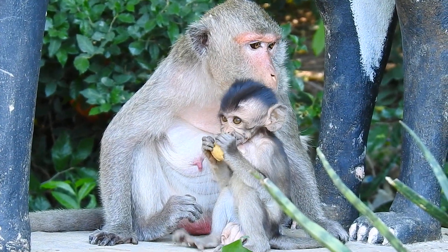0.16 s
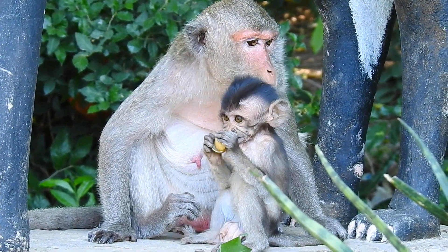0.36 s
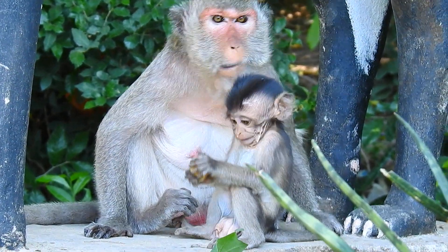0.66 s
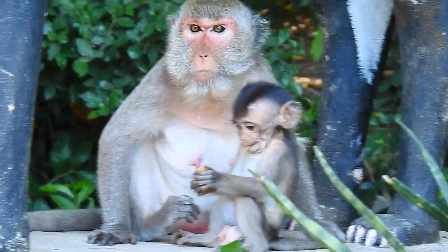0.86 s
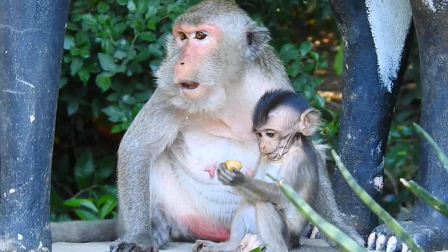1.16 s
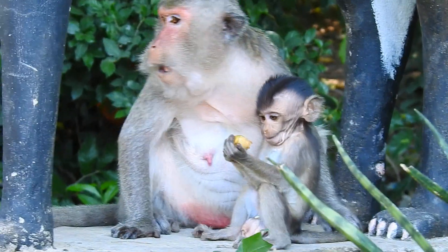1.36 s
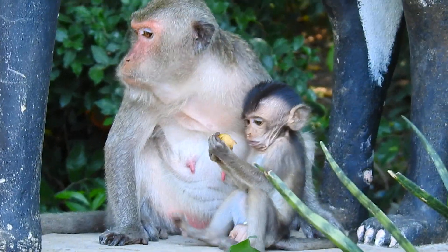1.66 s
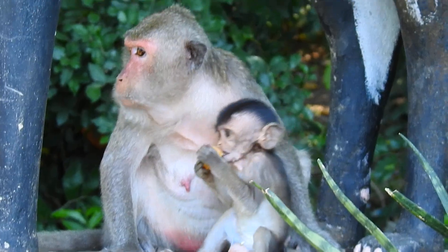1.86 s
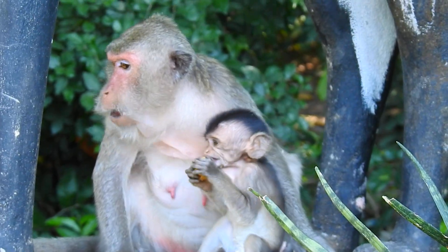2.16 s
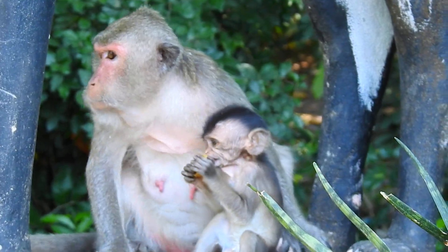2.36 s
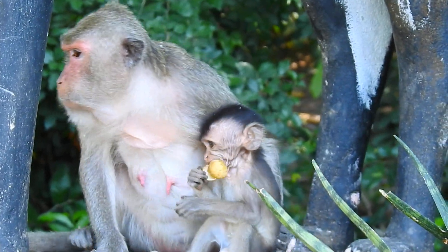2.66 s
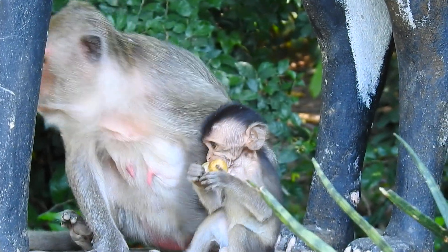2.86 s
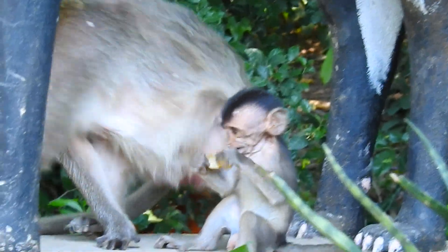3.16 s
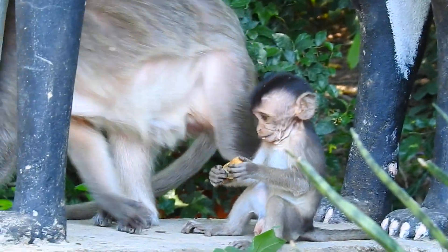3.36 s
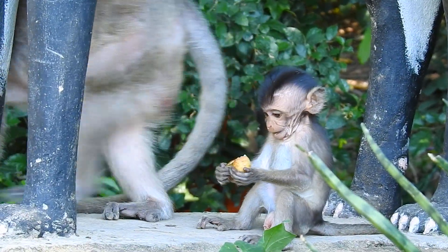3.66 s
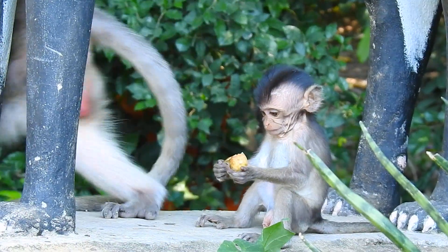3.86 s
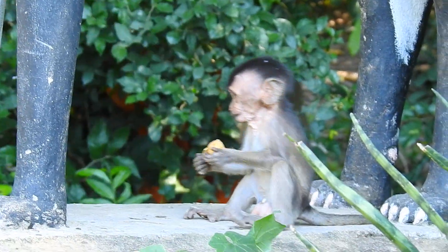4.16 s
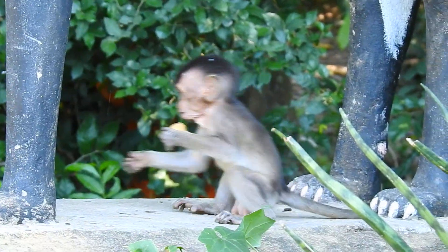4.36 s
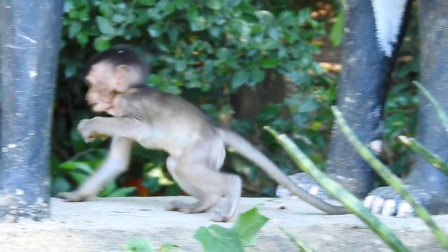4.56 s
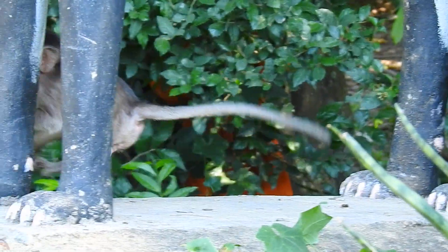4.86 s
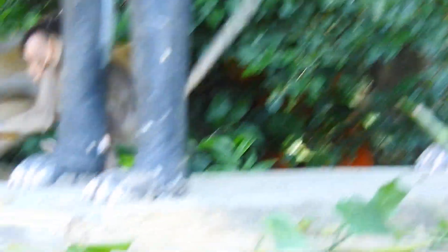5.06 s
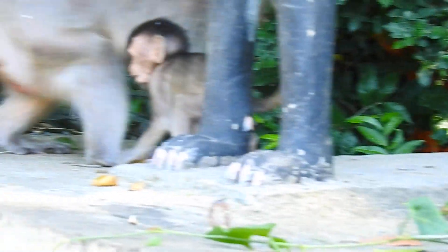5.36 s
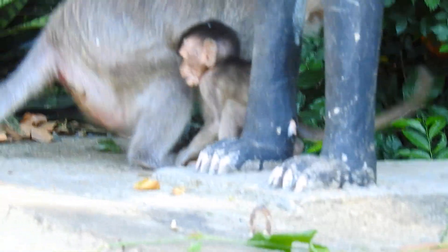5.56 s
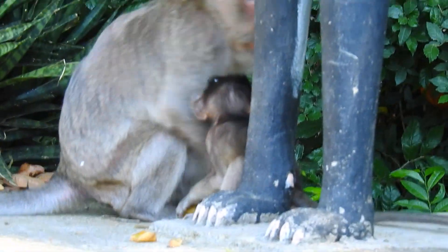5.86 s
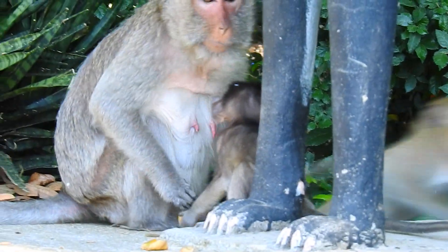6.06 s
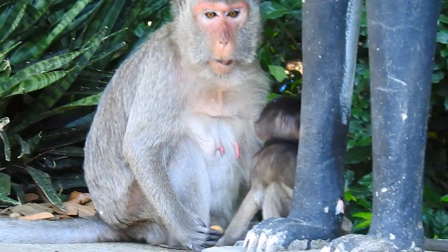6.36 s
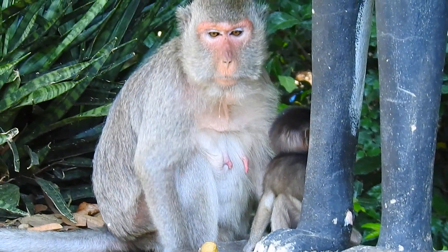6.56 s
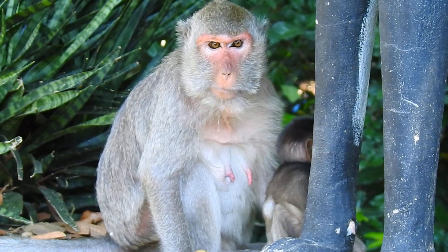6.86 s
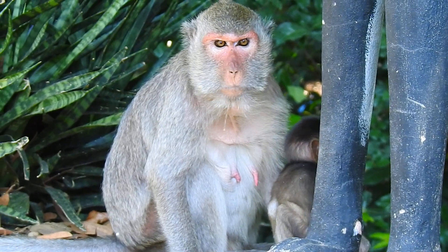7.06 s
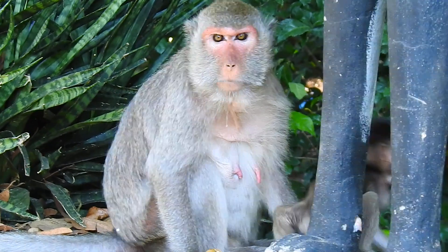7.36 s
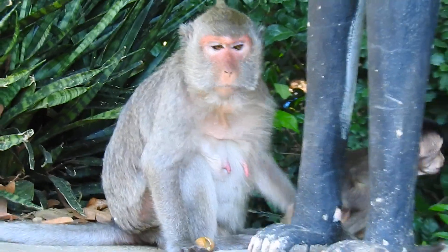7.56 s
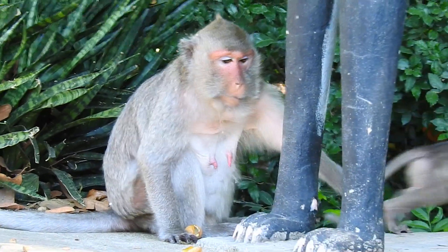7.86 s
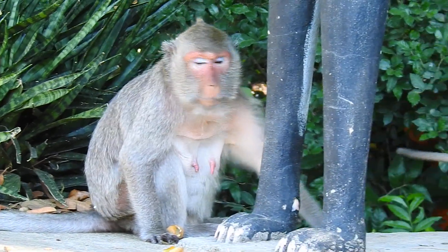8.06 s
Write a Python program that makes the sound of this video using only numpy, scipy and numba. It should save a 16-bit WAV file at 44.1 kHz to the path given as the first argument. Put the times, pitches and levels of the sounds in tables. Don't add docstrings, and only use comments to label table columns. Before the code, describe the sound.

Outdoors among stone statues, a small engine thumps at idle with traffic hum and leaf hiss, slowly receding. A far brake whines early on. Light foot and fruit knocks follow, then a young monkey whoops into a long, very thin scream that cracks into a loud shriek. Sound cuts out for a quarter second, then come whimpers, bright chirping cries and a closing wail. Stereo microphones a few metres away, short stony echoes.

```python
import sys
import numpy as np
from scipy import signal
from scipy.io import wavfile
from scipy.ndimage import uniform_filter1d, map_coordinates
from numba import njit

SR = 44100
rng = np.random.default_rng(int(sys.argv[2]) if len(sys.argv) > 2 else 0)


def generate_wav(sig):
    pcm = np.round(np.clip(np.atleast_2d(sig).T, -1, 1) * 32767).astype(np.int16)
    wavfile.write(sys.argv[1], SR, pcm)


def boost_factor(decibels):
    exponent = np.asarray(decibels, float) / 20
    return 10 ** exponent


N = 362061
TIME = np.arange(N) / SR


@njit
def svf(x, hz, width):
    y, b, l = np.empty(len(x)), 0., 0.
    for i in range(len(x)):
        g, k = np.tan(np.pi * hz[i] / SR), width / hz[i]
        v = (b + g * (x[i] - l)) / (1 + g * (g + k))
        b, l, y[i] = 2 * v - b, l + 2 * g * v, k * v
    return y


def band(x, hz, width):
    return svf(x, hz * np.ones(len(x)), float(width))


def band_twice(x, hz, width):
    return band(band(x, hz, width), hz, width)


def dull(x, hz):
    return signal.sosfilt(signal.butter(6, hz, fs=SR, output="sos"), x)


def unit(x):
    return x / np.sqrt(np.mean(x ** 2))


def walk(rate, size):
    k = max(int(SR / rate), 1)
    held = np.repeat(rng.standard_normal(size // k + 1), k)
    return 1.4 * uniform_filter1d(uniform_filter1d(held, k), k)[:size]


def read(table):
    s, *columns = np.transpose(table)
    span = slice(int(s[0] * SR), min(int(s[-1] * SR), N))
    t = TIME[span]
    fade = np.clip(np.minimum(t - t[0], t[-1] - t) / 0.0013, 0, 1)
    return span, [np.interp(t, s, c) for c in columns], fade


def note(start, length, first_hz, last_hz, db, peak=.2, start_db=-5, end_db=-5):
    top_hz = first_hz + peak * (last_hz - first_hz)
    return read([(start, first_hz, db + start_db),
                 (start + peak * length, top_hz, db),
                 (start + length, last_hz, db + end_db)])


def blend(ends, share):
    return ends[0] + share * (ends[1] - ends[0])


def turns(hz, jitter):
    return 2 * np.pi * np.cumsum(hz * (1 + jitter * walk(1500, len(hz)))) / SR


def stack(hz, levels, jitter):
    p = turns(hz, jitter)
    return np.sqrt(2) * sum(boost_factor(db) * np.sin((k + 1) * p) for k, db in enumerate(levels))


def pan(x, db):
    return x * boost_factor(np.array([[db], [-db]]) / 2)


def breeze():
    ports = [unit(band_twice(rng.standard_normal(N), 60, 70)) for _ in range(2)]
    return np.array([boost_factor(-60 + 3.0 * walk(3, N)) * port for port in ports])


# (time [s], level [dB])
TRAFFIC = [(0, -37), (.9, -37.5), (1.44, -37.5), (3.14, -40), (3.9, -41), (5.9, -42.5), (7.44, -44),
           (8.21, -44.5)]
# (time [s], level [dB])
GUSTS = [(0, -36.5), (.3, -36.5), (.6, -37), (.78, -36), (1.05, -39.5), (1.4, -43.5), (1.6, -40),
         (2.3, -40.5), (3.0, -42), (3.8, -42.5), (5.4, -41.5), (6.2, -45.5), (7.2, -45), (7.5, -46.5),
         (8.21, -46.5)]
# (frequency [Hz], density [dB per Hz])
TRAFFIC_COLOUR = [(30, -32.5), (61, -8.5), (85, -4), (164, 1), (500, -17.5), (760, -12), (1820, -17.5),
                  (2300, -15.5)]
# (frequency [Hz], density [dB per Hz])
LEAVES_COLOUR = [(3200, -23.5), (3680, -20), (4200, -21.5), (6550, -17), (9950, -100), (15500, -75)]


def outdoors():
    traffic_db = np.interp(TIME, *np.transpose(TRAFFIC)) + 3.0
    leaves_db = np.interp(TIME, *np.transpose(GUSTS)) + 2.0 + 0.5 * walk(4, N)
    f, colour_db = np.transpose(TRAFFIC_COLOUR + LEAVES_COLOUR)
    traffic, leaves = 0, 0
    for hz in 40 * 2 ** (np.arange(27) / 3):
        mid, side = (band_twice(rng.standard_normal(N), hz, hz / 3) for _ in range(2))
        wide = np.clip(0.41 * (hz / 2000) ** 0.57, 0, 1)
        db = np.interp(np.log(hz), np.log(f), colour_db) + 1.36 * walk(9.7, N)
        layer = boost_factor(db) * (mid + wide * side * np.array([[1], [-1]]))
        if hz < 3000:
            traffic = traffic + layer
        else:
            leaves = leaves + layer
    return pan(boost_factor(traffic_db) * unit(traffic), 1.7) + boost_factor(leaves_db) * unit(leaves)


# (time [s], pitch [Hz], level [dB], grip [0-1])
BRAKE = [(1.218, 1512, -55, 0), (1.232, 1567, -43, 0.07), (1.294, 1593, -38.5, 0.15),
         (1.356, 1612, -35, 0.43), (1.37, 1512, -36, .2), (1.395, 1510, -44, .4), (1.43, 1587, -35.5, 0),
         (1.478, 1609, -40.5, 0), (1.544, 1628, -40.5, 0.98), (1.866, 1600, -31, 0.63),
         (2.268, 1640, -38, 0.98), (2.4, 1618, -43, 0.38)]
# (level at loose grip [dB], level at full grip [dB])
BRAKE_ORDERS_DB = [(3, -9.5), (-14, 3), (-27, -33), (-46, 0.5)]
# (start [s], length [s], first pitch [Hz], last pitch [Hz], level [dB])
WHISTLES = [
    (1.941, .21, 11080, 10700, -77),
    (5.979, 0.065, 2610, 3351, -53),
    (6.052, .04, 3340, 3340, -54),
]


def whines():
    out = np.zeros((2, N))
    span, (hz, db, grip), fade = read(BRAKE)
    levels = [db + blend(ends, grip) for ends in BRAKE_ORDERS_DB]
    out[:, span] += pan(fade * stack(hz, levels, 0.004), 0.88)
    for row in WHISTLES:
        span, (hz, db), fade = note(*row, peak=.4, start_db=2, end_db=7)
        out[:, span] += fade * stack(hz * (1 + 0.01 * walk(25, len(hz))), [db], .006)
    return out


# (time [s], level [dB], lean to the deep resonance [dB])
ENGINE = [(0, -29.5, 0), (.27, -29, -0.5), (.98, -29, -2), (1.76, -34, -2.5), (2.24, -32.5, 3.5),
          (2.77, -34.5, 3), (3.53, -33.5, 3.5), (5.05, -39.5, -1), (5.75, -38, 3.5), (6.08, -41.5, -1),
          (6.46, -46, 9), (6.61, -39.5, 3.5), (8.21, -47, 0)]
# (time [s], firings [per s])
IDLE_HZ = [(0, 16.996), (1, 16.79), (1.7, 16.267), (4.8, 16.31), (5.6, 16.145), (8.21, 16.07)]
# (frequency [Hz], width [Hz], lead [s])
PIPE = [(87.7, 47, 0.0031), (116, 78.4, 0.00408), (224.4, 54, 0.01269), (360, 102, 0.01295)]
PIPE_DB, PIPE_LEAN = (-6, 0, -9, -19), (1, -1.06, 0.016, -0.13)


def engine():
    level_db, lean_db = (np.interp(TIME, np.transpose(ENGINE)[0], c) for c in np.transpose(ENGINE)[1:])
    count = .178 + np.cumsum(np.interp(TIME, *np.transpose(IDLE_HZ))) / SR
    whole = np.arange(1, count[-1])
    chance = rng.standard_normal((len(whole), 2))
    firing_s = np.interp(whole, count, TIME) + .0004 * chance[:, 0]
    pulses = np.zeros(N)
    pulses[(firing_s * SR).astype(int)] = boost_factor(0.68 * chance[:, 1])
    pulses += boost_factor(-16.5) * np.roll(pulses, int(0.02184 * SR))
    out = 0
    for db, lean, (hz, width, lead) in zip(PIPE_DB, PIPE_LEAN, PIPE):
        ring = band_twice(np.roll(pulses, -int(lead * SR)), hz, width)
        out = out - boost_factor(level_db + db + lean * lean_db) * unit(ring)
    return out


# (delay [s], level [dB])
ECHOES = [
    (.013, -9.5),
    (0.035, -9),
    (.048, -12),
    (0.076, -14),
]
# (frequency [Hz], decay time t60 [s], level [dB], stereo width [0-1])
TAIL = [(300, 0.6, -2, 0.09), (2946, 0.37, 2, 0.3), (6300, 0.47, 2, 0.58), (9500, .28, 3, .9),
        (14000, 0.15, 5.5, 1)]


def stones(x):
    t = TIME[:SR // 2]
    f, *columns = np.transpose(TAIL)
    shape = boost_factor(-1.5) * (1 - np.exp(-(t / .011) ** 2))
    for lag, db in ECHOES:
        shape = shape + boost_factor(db + 11) * np.exp(-((t - lag) / .006) ** 2)
    noise, answer = rng.standard_normal((2, len(t))), 0
    for hz in 250 * 2. ** np.arange(0, 6.5, .5):
        t60, db, wide = (np.interp(np.log(hz), np.log(f), c) for c in columns)
        mid, side = (band_twice(n, hz, hz / 2) for n in noise)
        answer = answer + boost_factor(db - 60 * t / t60) * (mid + wide * side * np.array([[1], [-1]]))
    where = np.arange(N) + .00003 * SR * walk(250, N)
    x = np.array([map_coordinates(ear, [where], mode="mirror") for ear in x])
    return signal.fftconvolve(x, boost_factor(-32) * shape * answer, axes=1)[:, :N]


# (time [s], peak [dB], centre [Hz], sharpness Q [1], ring t60 [s])
KNOCKS = [(0.737, -28, 1600, 0.72, 0.057), (1.054, -35, 530, 1.2, 0.045), (2.341, -34, 1620, 0.82, .03),
          (2.725, -39, 859, 1, .034), (3.344, -34, 725, 1, 0.034), (3.438, -34, 1460, 15, 0.064),
          (3.545, -35.5, 1200, 9, 0.059), (3.858, -24.5, 1010, 1, 0.02), (3.866, -36, 990, 1.5, 0.026),
          (4.334, -31, 1000, 1, .015), (4.352, -28, 950, 1.8, 0.041), (6.66, -31.5, 3350, 6, .03),
          (7.15, -46, 1170, 0.87, 0.037), (7.214, -36, 3900, 1.6, 0.028), (7.472, -34.5, 1000, 0.97, 0.041),
          (7.925, -32, 980, 3.8, 0.034), (7.928, -37.5, 5800, 3.4, 0.022), (7.969, -37, 1010, 2.2, 0.066),
          (4.195, -35.5, 603, 0.59, 0.12), (4.215, -35, 600, 0.73, 0.088), (.005, -36, 690, 2.8, 0.13),
          (.745, -37, 6000, 5.4, .06), (.432, -39, 6000, 3.4, .03), (.432, -39, 3100, 5, .04),
          (5.142, -28.5, 6000, 0.77, .01), (6.66, -34.5, 8130, 0.65, 0.25), (7.699, -37.5, 8160, .8, 0.26),
          (5.63, -47.5, 8300, .7, .3), (7.472, -42.5, 6000, 1, .02), (7.216, -47.5, 8150, 2, .015),
          (3.859, -30, 788, 1, .02)]
# (start [s], length [s], peak [share of length], thud [dB], scrape [dB])
SHUFFLES = [
    (5.47, .16, 0.52, -26, -33.5),
    (5.629, 0.057, 0.34, -44.5, -34),
]


def handling():
    out = np.zeros(N)
    t = TIME[:SR // 5]
    for s, db, hz, sharp, t60 in KNOCKS:
        noise = rng.standard_normal(len(t))
        noise[int(.001 * SR)] += 2.73 * 4
        burst = unit(dull(band(band(noise, hz, hz / sharp), hz, 2 * hz), 2.6 * hz))
        envelope = boost_factor(db + 4.0 - 60 * t / t60) * np.minimum(t / (0.061 * t60), 1)
        out[int(s * SR):][:len(t)] += burst * envelope
    for s, length, peak, thud_db, scrape_db in SHUFFLES:
        span, (_, swell_db), fade = note(s, length, 0, 0, 0, peak=peak, start_db=-11.0, end_db=-14.0)
        noise = rng.standard_normal((2, len(fade)))
        thud = band(noise[0], 229, 29.2) + band(noise[0], 287.0, 31.0)
        thud += boost_factor(-10.5) * band(noise[0], 560, 90.67)
        scrape = dull(band(noise[1], 1800, 3400), 6640) * boost_factor(2.4 * walk(78.7, len(fade)))
        out[span] += fade * boost_factor(thud_db + 1.83 * swell_db) * unit(thud)
        out[span] += fade * boost_factor(scrape_db + swell_db) * unit(scrape)
    return out


# (start [s], length [s], first pitch [Hz], last pitch [Hz], level [dB])
PUSHED = [
    (3.986, .022, 1818, 3365, -13),
]
RELAXED = [
    (7.582, 0.017, 2693, 2473, -21.5),
    (7.6, 0.015, 2480, 3100, -30),
    (7.768, .045, 1744, 1485, -19),
]
STRAINED = [
    (7.552, .016, 1467, 1680, -36),
    (7.566, .018, 1686, 1650, -33),
]
# (frequency [Hz], level [dB])
PUSHED_COLOUR = [(2000, -11.5), (3000, -11), (5500, -3), (8200, -7), (11000, -39.5)]
# (frequency [Hz], level [dB])
RELAXED_COLOUR = [(1500, -16.5), (2600, 0.5), (3200, -2.5), (4800, -9), (6300, -11), (8000, -20),
                  (10500, -39.5)]
# (frequency [Hz], level [dB])
STRAINED_COLOUR = [(1500, -23), (3300, -10), (5000, 6), (6700, -6), (8400, -1.5), (10200, -4)]
# (start [s], length [s], first pitch [Hz], last pitch [Hz], level [dB])
STRANDS = [(5.437, 0.049, 8200, 10860, -42), (5.622, .018, 7800, 7700, -38),
           (6.292, 0.011, 11600, 9300, -34), (6.333, 0.0218, 9600, 11000, -44),
           (6.735, 0.024, 5100, 5570, -33.5), (7.63, 0.051, 9300, 9700, -45), (7.7, 0.039, 9400, 8400, -44),
           (7.736, 0.014, 3540, 2870, -35), (7.598, .022, 8800, 6600, -25.5),
           (5.12, .025, 4800, 5100, -20.5), (5.124, 0.025, 5400, 5600, -19.5),
           (5.135, .011, 4300, 4100, -28), (5.126, .018, 8700, 8000, -23), (5.51, .03, 10700, 10400, -47),
           (4, 0.026, 10300, 10500, -43), (5.124, 0.017, 3150, 3000, -33.5),
           (5.113, .009, 6350, 6450, -24.5), (5.124, .016, 6000, 6600, -22.5),
           (6.672, .02, 11100, 11300, -46), (7.148, .015, 8100, 8200, -51), (5.8, 0.014, 7000, 6000, -35.5)]


def chest():
    out = np.zeros((2, N))
    # (notes, colour, tremble [share], left minus right [dB], peak [share of length])
    kinds = [(PUSHED, PUSHED_COLOUR, .09, 3, .85),
             (RELAXED, RELAXED_COLOUR, .042, -1.8, .45),
             (STRAINED, STRAINED_COLOUR, .015, -1.2, .6)]
    for rows, colour, jitter, pan_db, peak in kinds:
        f, colour_db = np.transpose(colour)
        for row in rows:
            span, (hz, db), fade = note(*row, peak=peak, start_db=-15, end_db=-8.5)
            levels = [db + np.interp(np.log(k * hz), np.log(f), colour_db) for k in range(1, 7)]
            out[:, span] += pan(fade * stack(hz, levels, jitter), pan_db)
    for row in STRANDS:
        span, (hz, db), fade = note(*row, peak=.4, start_db=0, end_db=-1.0)
        out[:, span] += pan(fade * stack(hz, [db], 0.026), -1.5)
    return out


# (time [s], pitch [Hz], level [dB], roughness [0-1])
WHOOP = [(3.996, 4890, -24, 0.54), (4.002, 5622, -16.5, .45), (4.0065, 7290, -9, .4),
         (4.009, 7900, -21, 0.46), (4.016, 9500, -20, .4), (4.026, 12800, -30.5, 0.61),
         (4.086, 13600, -44.5, 0.5), (4.172, 13150, -41, 0.5), (4.2, 14000, -41, 0.35)]
HELD = [(4.2, 14000, -42, .4), (4.25, 13700, -44.5, 0.34), (4.29, 13300, -43.5, 0.39),
        (4.33, 13270, -41, 0.449)]
SCREAM = [(4.33, 13300, -40, 0.47), (4.365, 14000, -40.5, 0.51), (4.417, 14300, -42, 0.51),
          (4.469, 13200, -44, 0.52), (4.499, 13900, -41, 0.4), (4.56, 14100, -37, 0.38),
          (4.6, 14450, -42.5, 0.45), (4.62, 15100, -43.5, .4), (4.66, 14900, -43.5, .35)]
SHRILL = [(4.66, 14800, -42.5, 0.37), (4.69, 15440, -41.5, 0.28), (4.74, 14960, -42.5, 0.374),
          (4.785, 15400, -43, 0.35), (4.8, 14500, -42.5, 0.27), (4.83, 15200, -39.5, 0.28),
          (4.862, 15300, -41.5, 0.23), (4.876, 14900, -40, 0.25), (4.9, 15000, -38.5, 0.31)]
SLIP = [(4.9, 15000, -37.5, .2), (4.92, 15550, -38, 0.22), (4.945, 14900, -40.5, .3),
        (4.955, 13900, -37, 0.305), (4.975, 14400, -28.5, 0.35), (5.0, 12500, -33, 0.57)]
BREAKUP = [(5.0, 12420, -32.5, .3), (5.018, 12300, -31, .3), (5.028, 11700, -27, 0.35),
           (5.031, 10100, -25, 0.58), (5.041, 9600, -28, 0.67), (5.05, 8000, -42, 0.85),
           (5.068, 9000, -42, .7)]
CRACK = [(5.069, 10000, -35, 0.11), (5.082, 10120, -22, .08), (5.088, 10050, -19, .1),
         (5.092, 10000, -41, 0.097), (5.097, 9900, -32, .1), (5.101, 9600, -17, .12),
         (5.112, 9150, -22, 0.2), (5.119, 9300, -24, 0.4)]
SHRIEK = [(5.12, 6900, -25, .5), (5.128, 7050, -19.5, 0.54), (5.136, 7350, -15, .5),
          (5.146, 7800, -25.5, .55)]
WHIMPER = [(5.432, 7938, -43, 0.5), (5.445, 8340, -37, 0.498), (5.49, 8776, -38.5, 0.55),
           (5.505, 7550, -52, 0.9), (5.53, 6500, -42, 0.94), (5.57, 6300, -36.5, 0.98), (5.6, 6300, -40, 1),
           (5.635, 6800, -44, 0.97)]
SOB = [(5.638, 7306, -29.5, .5), (5.65, 7200, -23, .5), (5.658, 6300, -22, 0.46), (5.67, 5500, -20, .5),
       (5.682, 5500, -29, .6), (5.69, 6000, -24, .7), (5.705, 6200, -28.5, .75), (5.72, 5710, -27, 0.58),
       (5.735, 5710, -42, 0.61)]
CHIRP = [(6.278, 6480, -12.5, .05), (6.285, 6450, -4.5, .05), (6.292, 6356, -14, .1),
         (6.296, 5723, -14, .1), (6.301, 5190, -19, .1), (6.305, 6300, -40, 0.11), (6.32, 6400, -26, .1),
         (6.327, 6500, -36, .1)]
ARCH = [(6.329, 6600, -7.5, 0.0092), (6.348, 6900, -10, 0), (6.36, 7020, -13.5, 0), (6.378, 6386, -12, 0.1),
        (6.388, 5600, -19, .15), (6.395, 4837, -29, 0.25)]
RISE = [(6.612, 5500, -29, 0.1), (6.626, 6144, -11.5, 0.11), (6.642, 5900, -15, 0.2),
        (6.65, 5967, -23.5, 0.3), (6.654, 6300, -11.5, 0.3), (6.664, 7100, -13, 0.27),
        (6.682, 7650, -22.5, 0.31), (6.702, 7950, -25.5, .45), (6.715, 7900, -28, 0.72)]
RASP = [(7.545, 7570, -28, 0.3), (7.556, 7600, -41, 0.84), (7.578, 8470, -42, 0.844),
        (7.586, 7280, -30, 0.88), (7.6, 7200, -26.5, 0.87), (7.608, 6060, -37, 1)]
WAIL = [(7.608, 5040, -20, 0.35), (7.619, 5290, -19, 0.12), (7.623, 5405, -10, 0.059),
        (7.645, 5630, -11.5, .05), (7.665, 5860, -17.5, 0.083), (7.697, 5730, -19, 0.1),
        (7.71, 5500, -21, 0.13), (7.728, 5040, -17, 0.16), (7.747, 3900, -34, 0.3)]
CRIES = [(WHOOP, 3.2), (HELD, 2), (SCREAM, 1.5), (SHRILL, 1.2), (SLIP, .8), (BREAKUP, 0.42), (CRACK, .4),
         (SHRIEK, .4), (WHIMPER, -1.2), (SOB, -1.2), (CHIRP, 1.8), (ARCH, -1.3), (RISE, -3), (RASP, -1.1),
         (WAIL, -1.7)]
# (frequency [Hz], width [Hz], level [dB])
THROAT = [(5500, 4100, -9), (6950, 890, 2), (9250, 2400, -18.5)]
# (start [s], length [s], first pitch [Hz], last pitch [Hz], level [dB])
UNDER_NOTES = [(4.203, 0.036, 4400, 4600, -41), (4.425, .055, 5200, 5250, -45),
               (4.437, .03, 3620, 3700, -40), (4.478, .08, 4380, 4290, -43),
               (4.369, 0.06, 3400, 3486, -44.5), (4.417, 0.056, 4450, 4370, -38),
               (4.474, 0.091, 3920, 3560, -40), (4.578, 0.036, 4690, 4930, -36.5),
               (4.605, 0.027, 4900, 5150, -38), (4.641, 0.059, 4750, 4150, -37.5),
               (4.695, 0.045, 3690, 3500, -38), (4.76, 0.026, 3580, 4430, -36),
               (4.786, 0.017, 4300, 3800, -34.5), (4.816, 0.02, 4200, 4750, -41),
               (4.844, 0.028, 5050, 5170, -30.5), (4.877, 0.022, 4250, 4000, -38),
               (4.902, .02, 5130, 5060, -31.5), (4.933, 0.06, 4150, 3970, -33)]
JITTER, WARBLE_RAD = (.005, .07), (.03, 1.2)
HALF_DB, RASP_DB, HOARSE_DB = (-50, -3), (-32.5, 6.5), (-31, 10)


def monkey():
    hz, loud, (rough, side_db) = np.full(N, 6000.), np.full(N, -120.), np.zeros((2, N))
    for table, pan_db in CRIES:
        span, columns, _ = read(table)
        hz[span], loud[span], rough[span] = columns
        side_db[span] = pan_db
    hz, rough = uniform_filter1d(hz, int(0.0037 * SR)), np.clip(rough, 0, 1)
    octaves_up = np.log2(hz / 6000)
    shares = [0 * hz,
              -33 - 36 * rough - 18 * octaves_up,
              blend(HALF_DB, rough),
              blend(RASP_DB, rough),
              blend(HOARSE_DB, rough) + 12 * octaves_up]
    tone, octave, half, rasp, hoarse = uniform_filter1d(boost_factor(loud + np.array(shares)), int(.0016 * SR))
    jitter = blend(JITTER, rough ** 2)
    hz = hz * (1 + jitter * walk(70, N))
    warble = np.sin(turns(np.full(N, 1200.), 0.098))
    p = turns(hz, jitter) + blend(WARBLE_RAD, rough ** 2) * warble
    voice = tone * np.sin(p) + octave * (hz < 7800) * np.sin(2 * p)
    voice += half * np.sin(p / 2 + 3.0 * walk(700, N))
    voice = voice * np.sqrt(2) * boost_factor(np.minimum(120 * jitter, 3) * walk(200, N))
    torn = band(rng.standard_normal(N), .84 * hz, 3000)
    torn = band(band(torn, 0.79 * hz, 3000), .84 * hz, 3000)
    voice += rasp * unit(torn)
    shift = 1 + .03 * walk(14, N)
    air = unit(sum(boost_factor(db) * band_twice(rng.standard_normal(N), f * shift, w) for f, w, db in THROAT))
    voice += hoarse * dull(air, 10500) * boost_factor(2.6 * walk(150, N))
    out = voice * boost_factor(np.array([side_db, -side_db]) / 2)
    for row in UNDER_NOTES:
        span, (low_hz, db), fade = note(*row, peak=0.23, start_db=0.0, end_db=-2)
        q = turns(low_hz * (1 + 0.018 * walk(150, len(fade))), .03)
        q += .45 * np.sin(turns(750 + 0 * low_hz, .06))
        flutter = np.sqrt(2) * boost_factor(db + 3.5 * walk(109.4, len(fade)))
        under = np.sin(q) + boost_factor(-17.5) * np.sin(2 * q) + boost_factor(-10) * np.sin(p[span] - q)
        out[:, span] += pan(fade * flutter * under, 1.5)
    return out


def scene():
    near = monkey() + chest() + handling()
    return breeze() + outdoors() + whines() + engine() + stones(near + whines()) + near


def low_pass(x):
    return signal.sosfilt(signal.butter(12, 15670, fs=SR, output="sos"), x)


MUTE_S = (5.1455, 5.3925)


def record(dry):
    dry = np.array([ear - 0.66 * band(ear, 3783, 270) for ear in dry])
    dry = signal.sosfilt(signal.butter(2, 48, "high", fs=SR, output="sos"), dry)
    gate = np.clip(np.maximum(MUTE_S[0] - TIME, TIME - MUTE_S[1]) / 0.0016, 0, 1)
    top_cut = signal.ellip(8, .2, 60, 15670, fs=SR, output="sos")
    mix = signal.sosfilt(top_cut, np.clip(dry, -1, 1) * gate)
    return low_pass(mix)


dry = scene()
out = record(dry)
generate_wav(out)
```